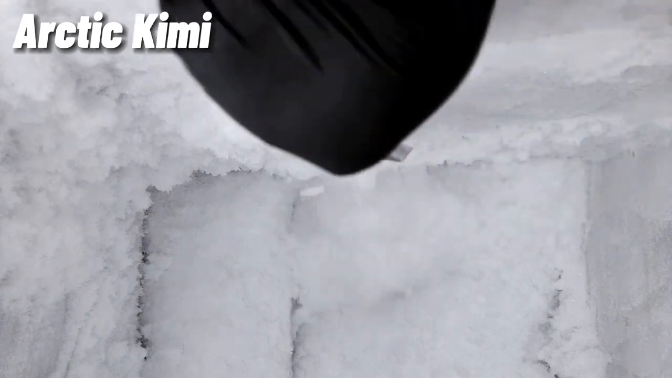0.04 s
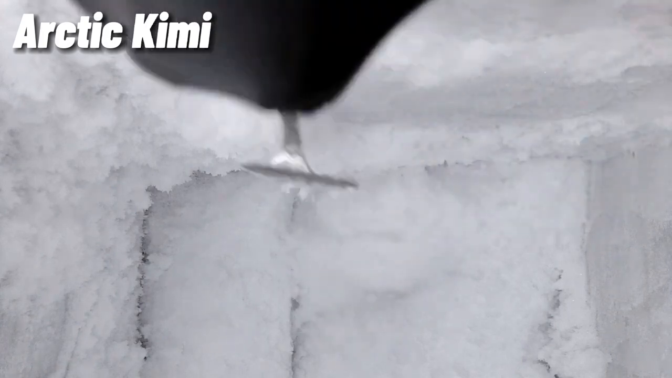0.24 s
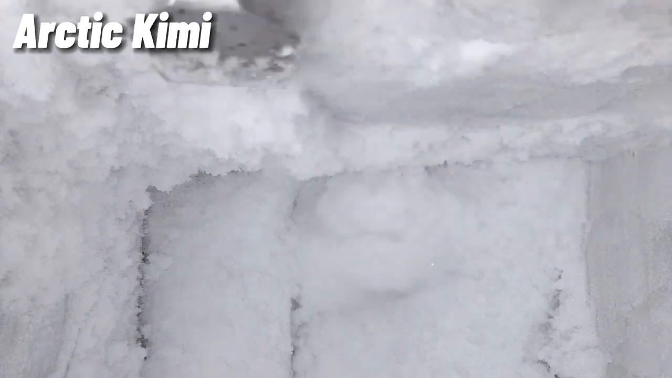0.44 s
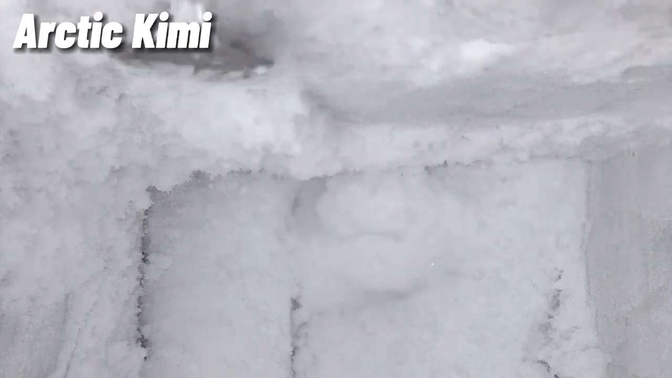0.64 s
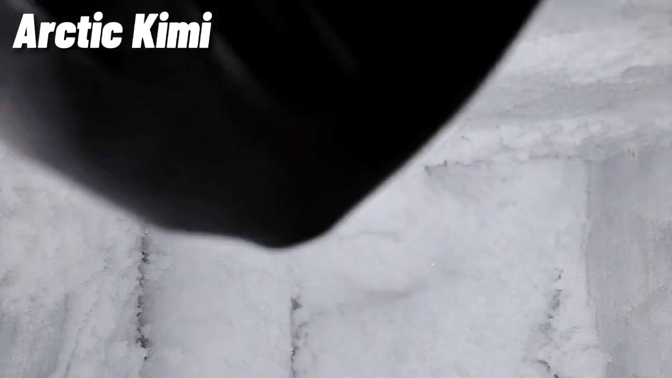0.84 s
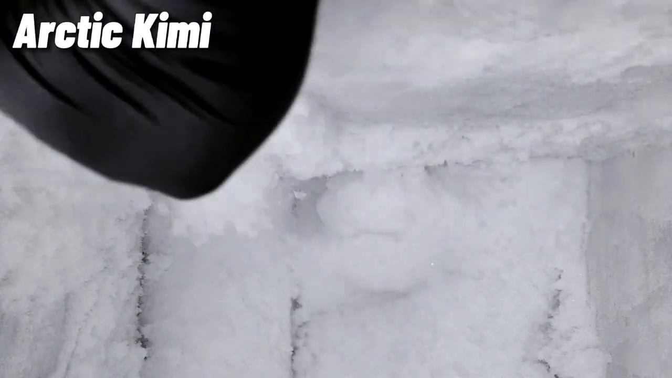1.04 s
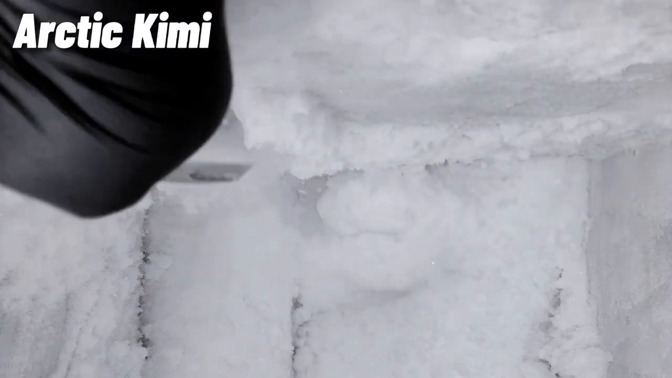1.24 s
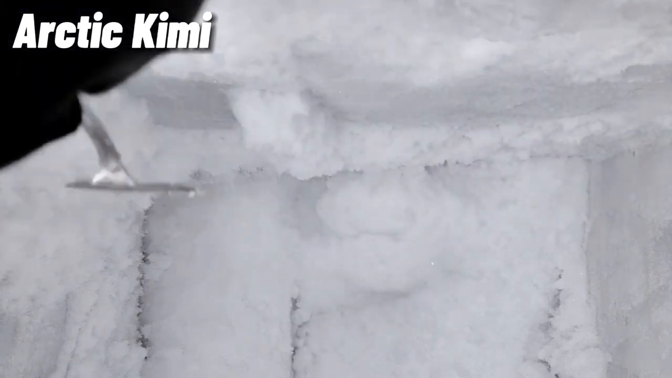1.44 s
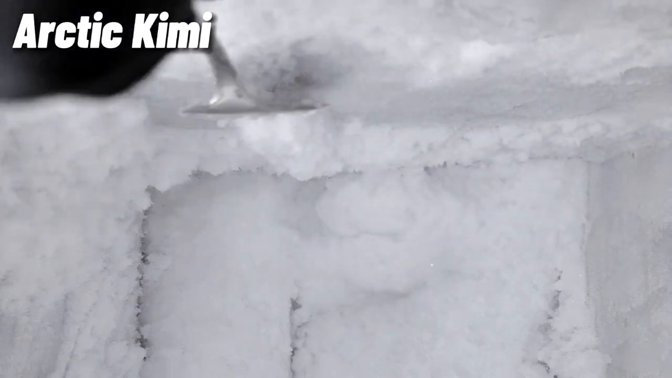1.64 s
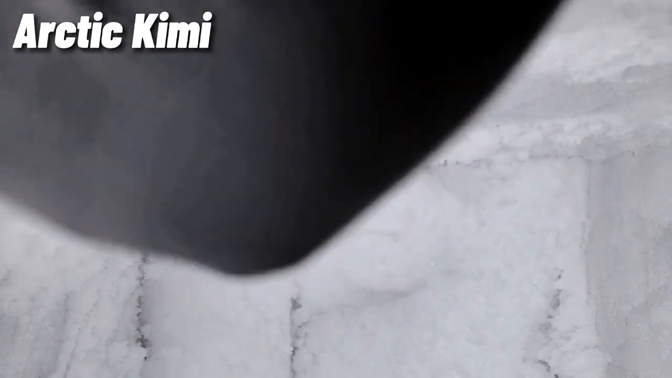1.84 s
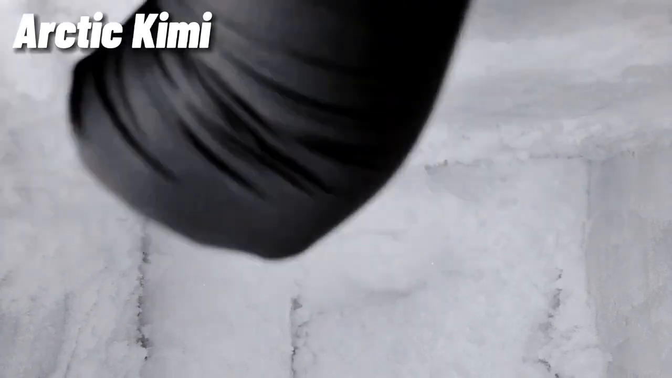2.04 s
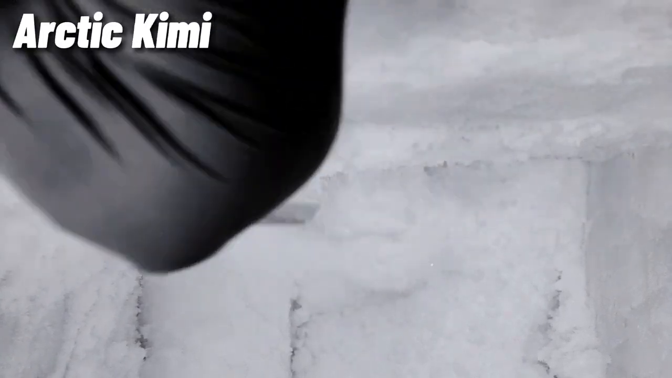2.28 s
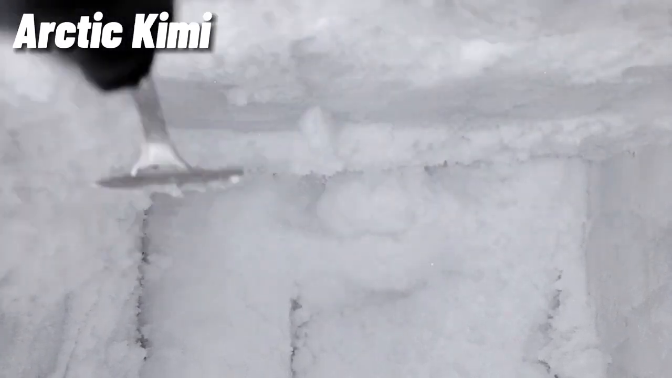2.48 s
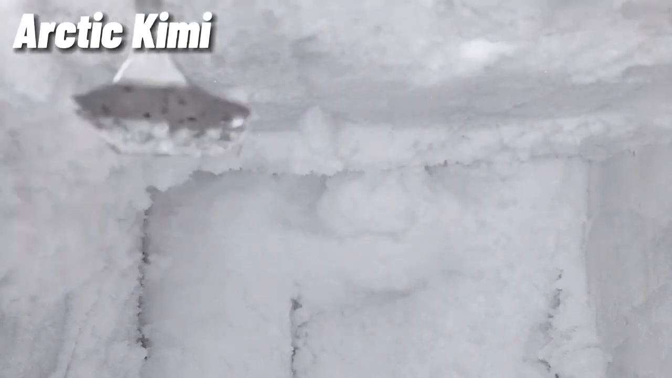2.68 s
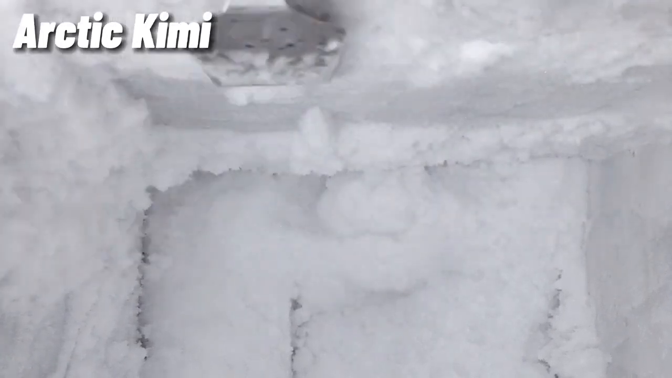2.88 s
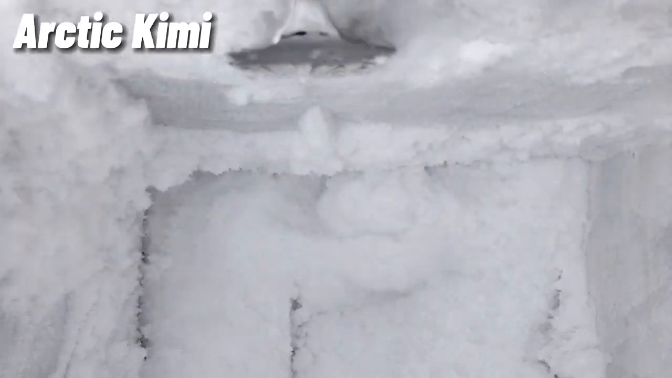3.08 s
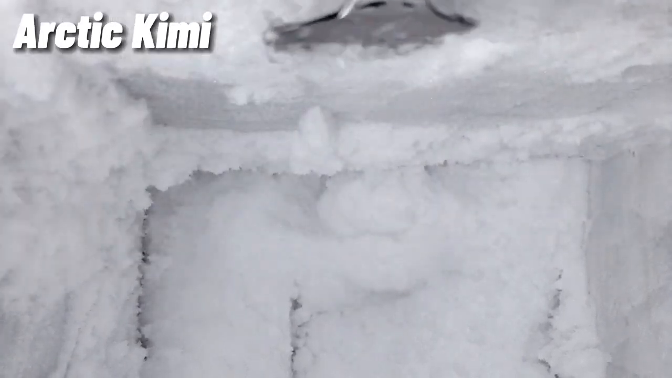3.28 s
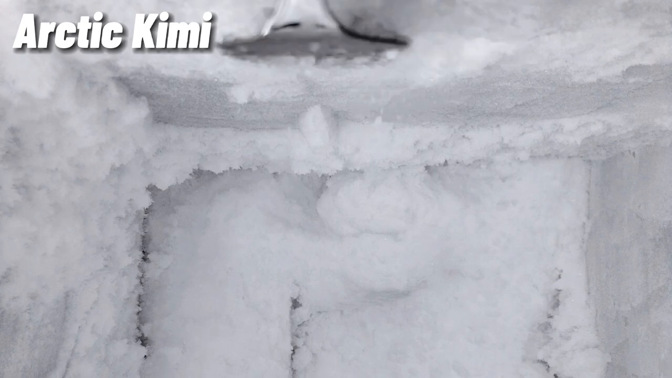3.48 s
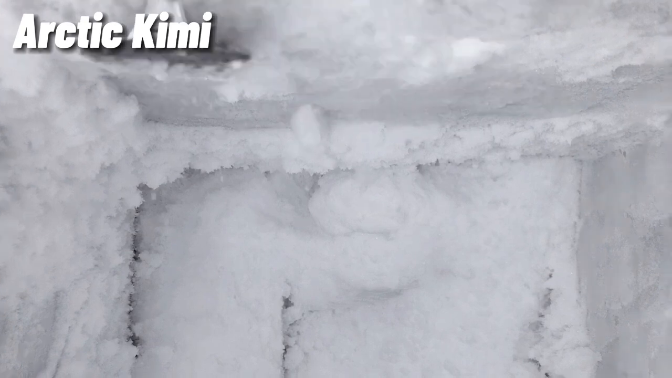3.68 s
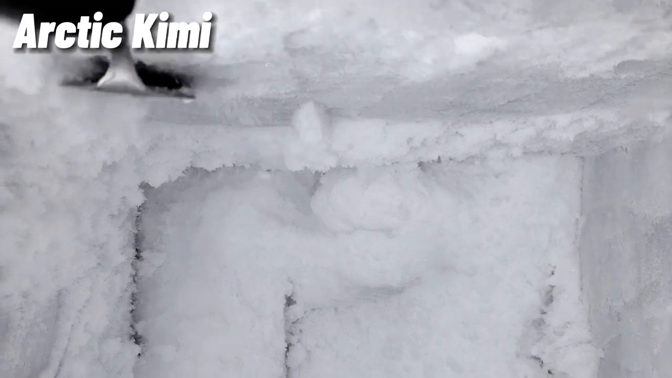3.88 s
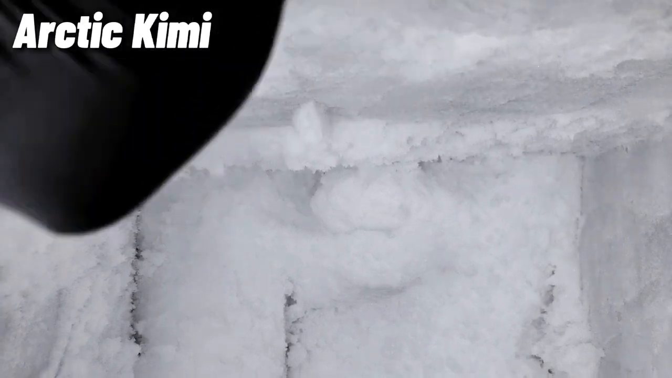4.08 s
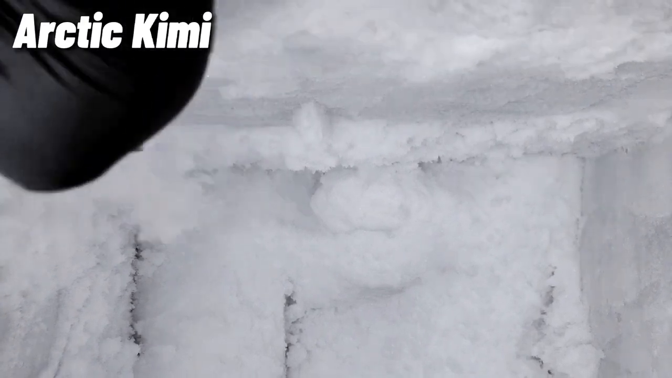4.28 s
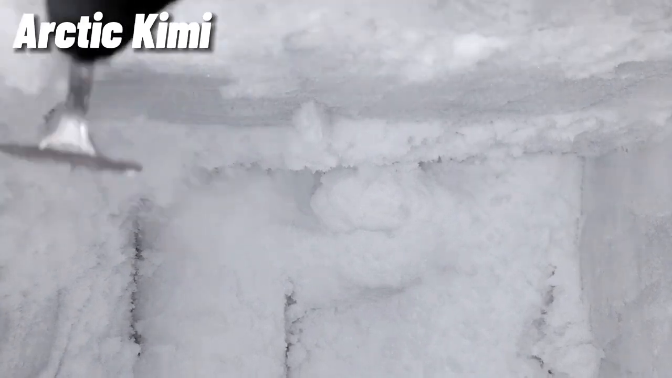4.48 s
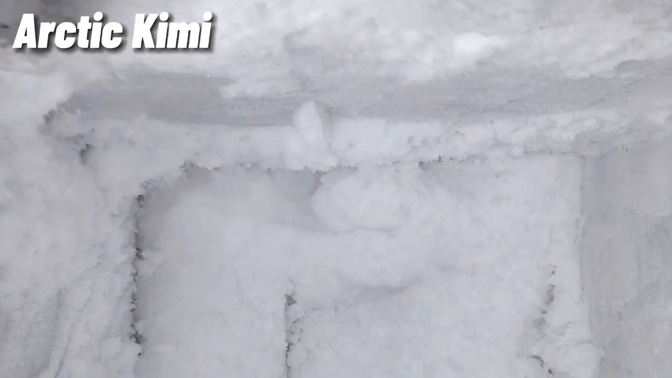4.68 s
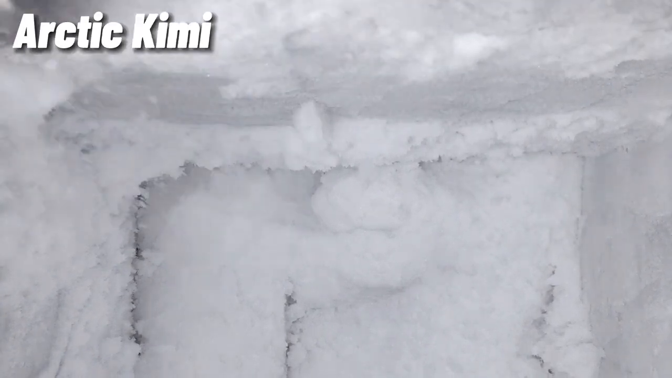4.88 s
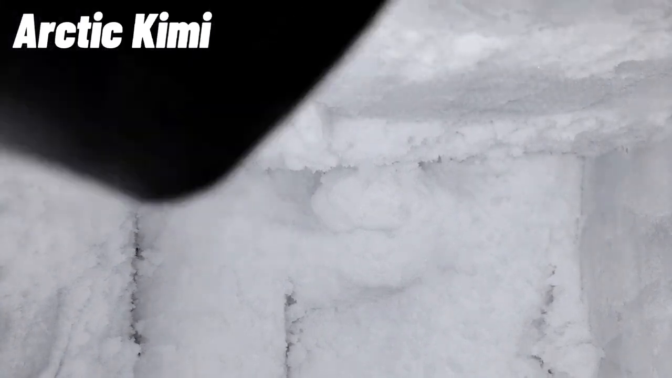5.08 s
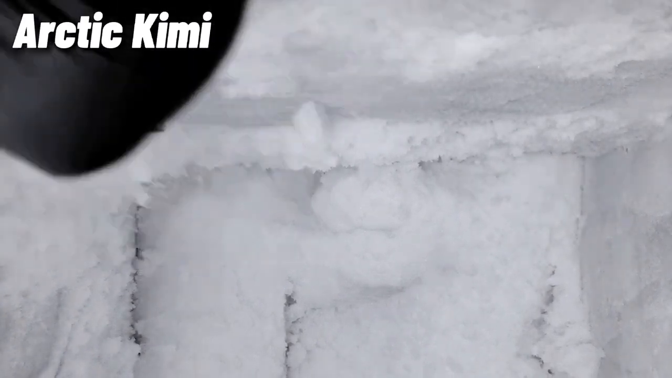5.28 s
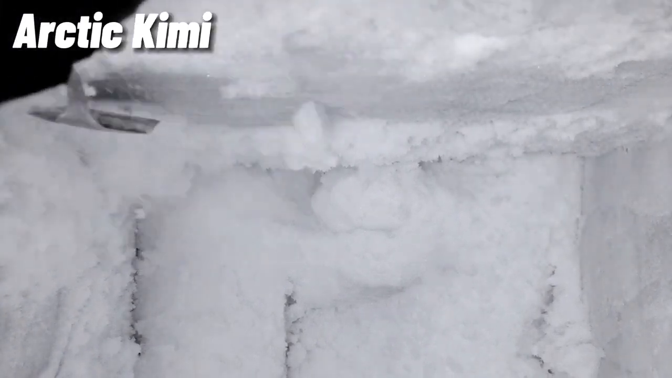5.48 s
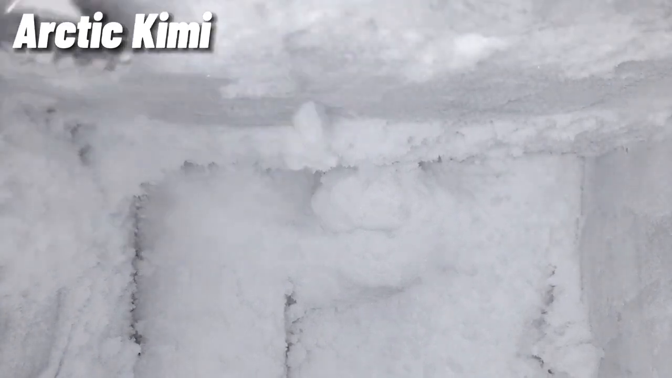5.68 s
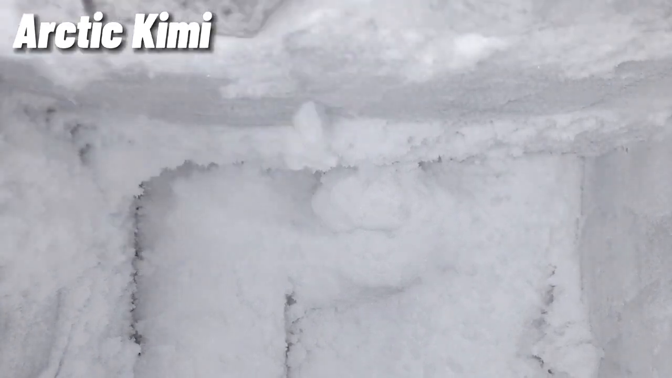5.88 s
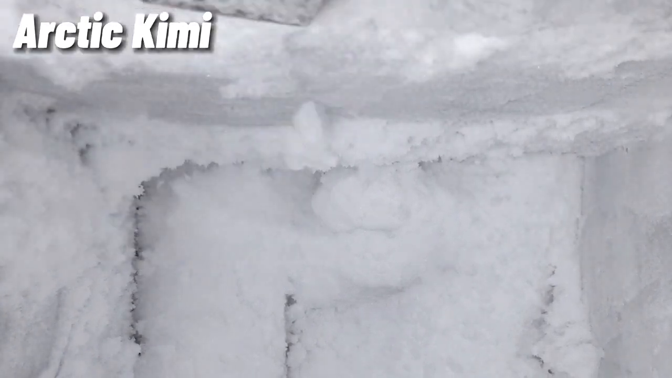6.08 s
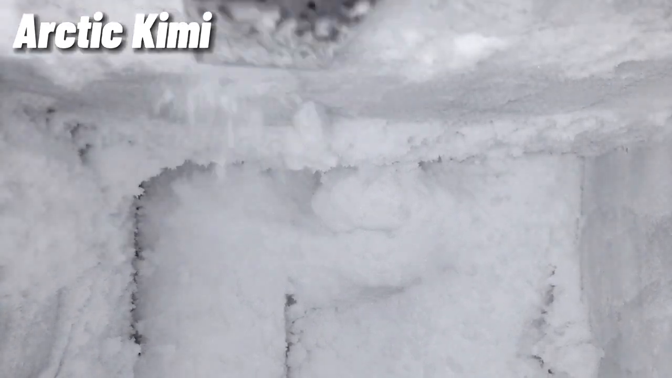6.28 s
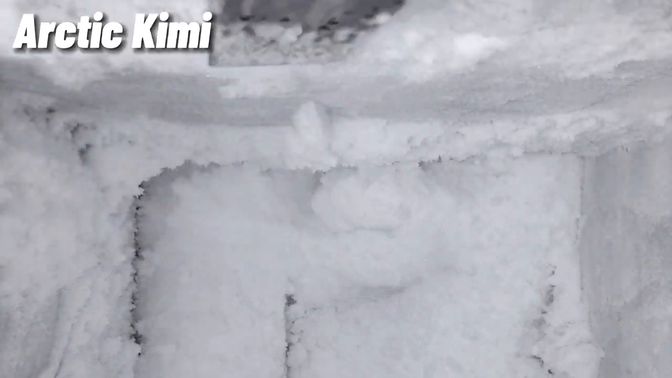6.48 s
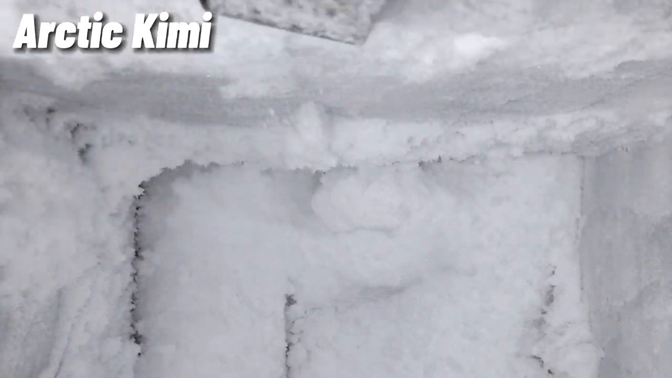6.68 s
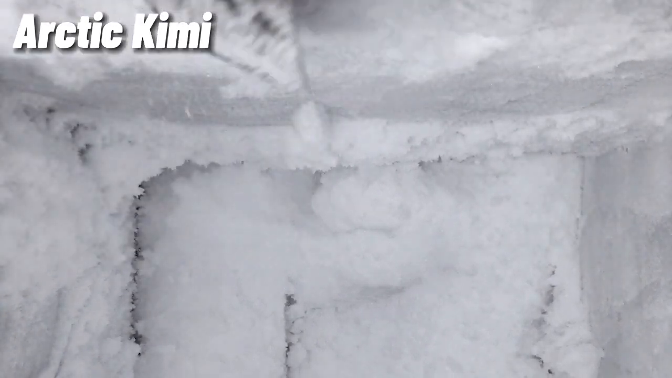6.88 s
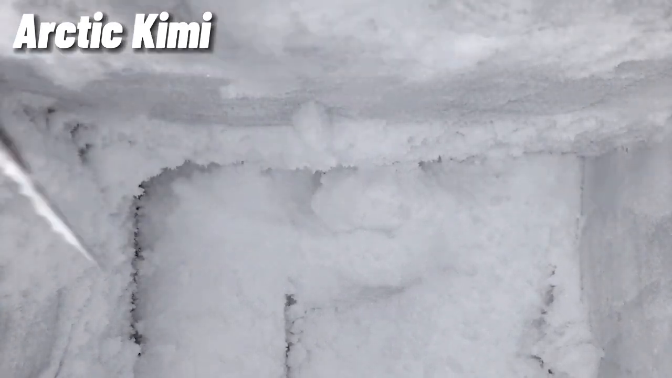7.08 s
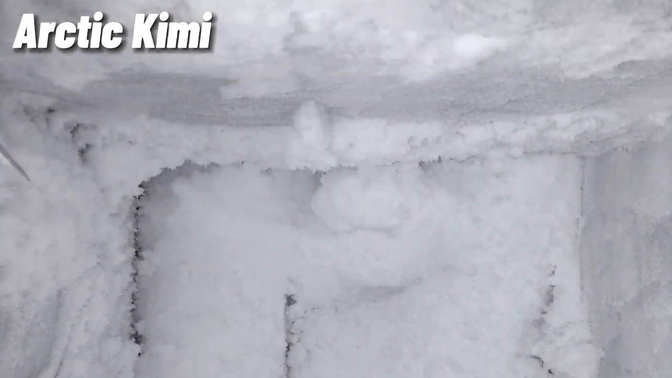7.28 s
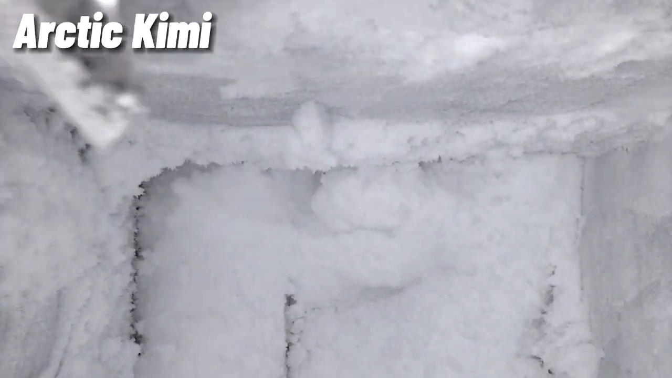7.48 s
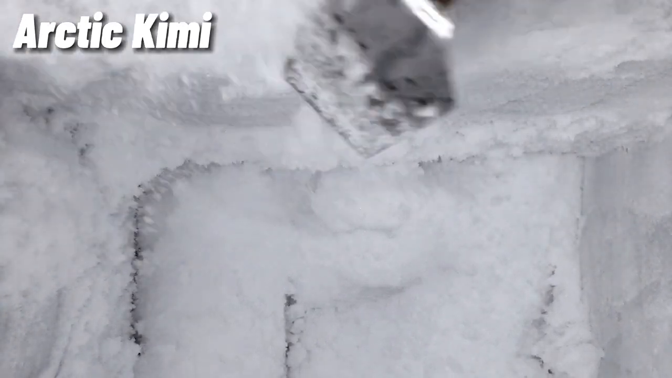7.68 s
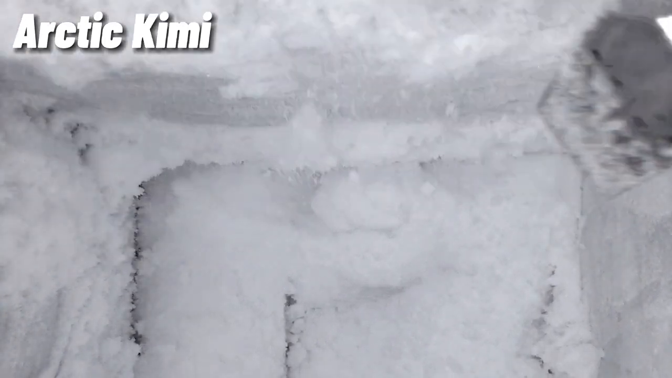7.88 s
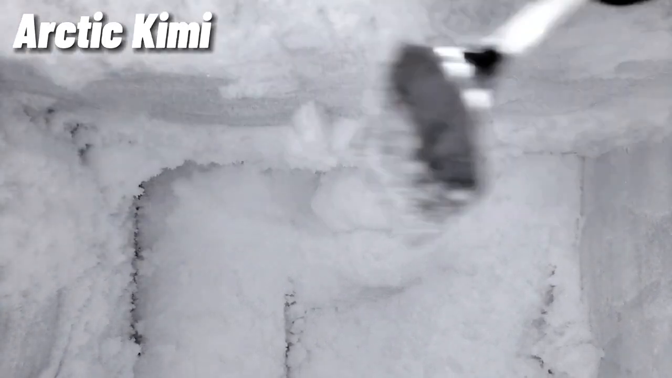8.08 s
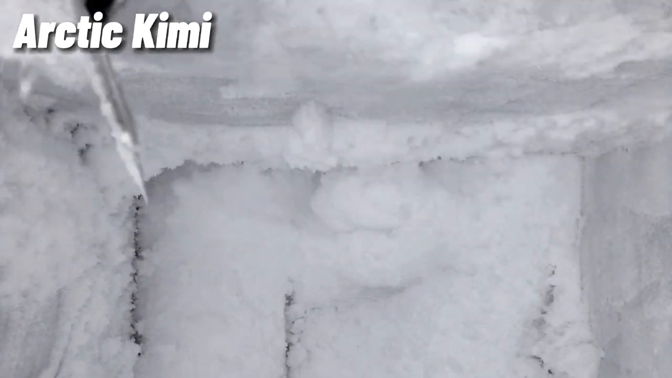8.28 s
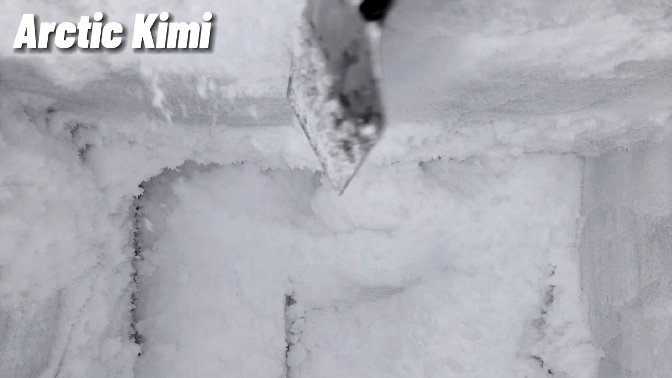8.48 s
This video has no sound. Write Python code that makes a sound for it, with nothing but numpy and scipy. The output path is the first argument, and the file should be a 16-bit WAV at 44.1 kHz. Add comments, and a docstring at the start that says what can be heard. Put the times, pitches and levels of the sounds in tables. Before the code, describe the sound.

A metal scraper works at thick freezer frost, very close. Gritty crunching strokes come in irregular bursts, with the hollow cabinet wall booming underneath. Sharp cracks and thuds mark the jabs, the blade pings briefly when it slips free, and short rough squeals appear now and then. Crumbs of frost trickle afterwards. Tight reflections from the frosted box, a faint room tail and a low motor hum.

```python
"""A steel scraper is dragged and jabbed through thick frost inside a freezer.
Thousands of random ice fractures excite the resonances of the blade and of the hollow cabinet.
Stick-slip makes the edge squeal and the wall groan; jabs crack and thud, loosened frost trickles.
The freed blade pings in decaying bending modes, with short reflections, over a low motor hum."""
import sys
import numpy as np
from scipy import signal
from scipy.fft import rfft, irfft, next_fast_len
from scipy.io import wavfile
from scipy.ndimage import uniform_filter1d

SR = 44100
rng = np.random.default_rng(int(sys.argv[2]) if len(sys.argv) > 2 else 0)


def to_wav(sig):
    """Store sig (one row per channel, or 1-D mono) as 16-bit WAV at the path in sys.argv[1].

    Samples outside -1..1 are clipped; the rate is SR.
    """
    pcm = np.clip(np.atleast_2d(sig), -1, 1) * 32767
    pcm = np.round(pcm).astype(np.int16)
    wavfile.write(sys.argv[1], SR, pcm.T)  # frames by channels


N = 376613
TIME = np.arange(N) / SR
WALL_HZ, FIZZ_HZ = 430, 5500  # lower and upper limits of the coarse crunch

# the steel is jabbed through to solid ice; levels are relative, before the trim of each layer:
# start_s, crack_peak_db, crack_brightness_hz, thud_peak_db, thud_pitch_hz, crumbling_frost_db
JAB_EVENTS = [(.009, -29, 1980, -10, 333, -35), (0.291, -37, 1500, -22.5, 604, -47.5),
              (.372, -50, 1500, -28.5, 403, -50), (0.408, -38, 2470, -56, 400, -53),
              (0.573, -4, 2060, -16.5, 236, -19), (2.705, -35, 3130, -44, 250, -47.5),
              (2.873, -40, 4100, -61, 250, -56), (2.994, -15, 1565, -11, 134, -19.5),
              (3.02, -7, 805, -9.5, 222, -31.5), (3.1985, -20, 5050, -25, 200, -44),
              (4.717, -15, 3320, -43, 250, -40), (5.026, -5.5, 2660, -48, 250, -26.5),
              (5.132, -10, 1500, -10, 112, -23), (5.843, -20.5, 1900, -52, 203, -30.5),
              (6.04, -30, 4100, -25, 200, -21), (6.342, -7, 2430, -32, 198, -20.5),
              (6.372, -11, 1990, -29, 200, -19.5), (6.48, -14, 1190, -13.5, 333, -21.5),
              (6.527, -19, 2020, -19, 125, -30.5), (6.569, -21, 2200, -49, 250, -28.5),
              (6.697, -9, 1960, -34, 199, -23), (6.748, -14, 2770, -34, 198, -24),
              (6.879, -16.5, 5600, -36, 200, -32), (6.948, -27, 1400, -52, 300, -45.5),
              (7.317, -11, 1250, -2, 255, -29), (7.742, 1, 4180, -7.5, 191, -15),
              (8.36, -13, 1310, -9, 250, -20), (8.425, -33, 2000, -22, 200, -22.5),
              (8.456, -19, 3000, -24, 217, -23)]
# blade resonances while it touches the ice: centre_hz, width_hz, level_db (relative)
BLADE_MODES = [(760, 26, -14), (899, 42, 0), (1210, 190, 2.5), (1550, 174, 1.5), (1874, 90, 3.5),
               (2073, 184, 3.5), (2760, 350, -3.5), (3543, 224, -0.5), (3750, 88, -13), (4897, 224, -4),
               (5526, 138, -4), (6510, 420, -7), (7190, 100, -10.5), (7710, 103, 0.5), (8830, 60, -11.5),
               (8350, 130, -2.5), (9130, 23, 1.5), (9810, 130, -3), (10440, 146, -4.5), (10760, 220, -7.5),
               (11740, 160, -9), (12550, 180, -4), (11360, 200, -23.5), (12780, 95, -5),
               (13750, 200, -18.5), (14300, 370, -13), (14500, 100, -10.5)]
# cabinet wall and cavity resonances: centre_hz, width_hz, level_db (relative)
CABINET_MODES = [(50, 180, -18.5), (90.1, 5.7, -4.5), (124, 20, -27.5), (154.6, 14.5, 1),
                 (181.4, 14, -18.5), (224.3, 8.5, -8), (259, 69, -14.5), (301.6, 16.5, -7.5),
                 (373, 21, -10), (416.5, 13, -10), (534, 118, -22.5), (702, 69, -13.5)]


def amp(db):
    """Amplitude ratio of a level in decibels."""
    return 10 ** (np.asarray(db) / 20)


def evened(x):
    """Normalisation to an rms value of 1."""
    return x / np.sqrt(np.mean(x ** 2) + 1e-20)


def unit(response):
    """Normalisation of an impulse response to unit energy."""
    return response / np.linalg.norm(response)


def add(mix, s, sound):
    """Superposition of a sound on the mix, in place, from time s."""
    part = mix[max(round(s * SR), 0):][:len(sound)]
    part += sound[:len(part)]


def through(x, response):
    """Linear filtering by convolution with an impulse response."""
    return signal.oaconvolve(x, response)[:N]


def cut(x, hz, kind, order):
    """Butterworth low-pass or high-pass filtering."""
    return signal.sosfilt(signal.butter(order, hz, kind, fs=SR, output="sos"), x)


def colour(points, size):
    """Spectral gain at each FFT bin, interpolated over log frequency."""
    hz, db = np.transpose(points)
    bins_hz = np.fft.rfftfreq(size, 1 / SR)
    return amp(np.interp(np.log(bins_hz + 1), np.log(hz + 1), db))


def snap(gain):
    """Minimum-phase click with the given bin gains, by folding the cepstrum."""
    cepstrum = irfft(np.log(gain + 1e-5))
    half = len(cepstrum) // 2
    cepstrum[1:half] *= 2
    cepstrum[half + 1:] = 0
    return irfft(np.exp(rfft(cepstrum)))


def filtered_noise(gain, size):
    """Gaussian noise shaped by a spectral gain, with an rms of 1."""
    return evened(irfft(rfft(rng.standard_normal(size)) * gain, size)[:N])


def wander(hz):
    """Slow random fluctuation of rms 1: noise that rolls off steeply above hz."""
    size = next_fast_len(N)
    return filtered_noise(1 / (1 + (np.fft.rfftfreq(size, 1 / SR) / hz) ** 4), size)


def ringing(modes, size):
    """Modal impulse response of a body, with dark valleys between its resonances."""
    f = np.fft.rfftfreq(size, 1 / SR)
    power = np.zeros(len(f))
    for hz, width, db in modes:
        resonance = 1 / (1 + (2 * (f - hz) / width) ** 2)
        skirt = 1 / (1 + ((f - hz) / (5 * width)) ** 2)
        power += amp(db) ** 2 * resonance * skirt
    return unit(snap(np.sqrt(power)))


def decaying_sum(impulses, decay_s):
    """Exponential relaxation after each impulse, by a one-pole recursion."""
    return signal.lfilter([1], [1, -np.exp(-1 / (decay_s * SR))], impulses)


def lagged(x, lag_s):
    """First-order lag: a one-pole smoother of time constant lag_s."""
    keep = np.exp(-1 / (lag_s * SR))
    return signal.lfilter([1 - keep], [1, -keep], x)


def scrape(crunch, push, fizz, crunch_db=-3.0, wall_db=-3.0, fizz_db=-0.5, clump_db=1.5, clump_hz=130):
    """Random fracture excitation, radiated directly, through the blade and through the wall."""
    # colour of snapping crystals: frequency_hz, density_db (relative, per Hz)
    crystal_spectrum = [(300, -13), (450, -3.5), (750, 4), (1050, -25.5), (1500, 2.5), (1950, -4.5),
                        (2400, -0.5), (3200, -3), (4200, -6.5), (5000, -16.5), (6200, -20.5),
                        (10000, -25.5), (12800, -22), (15500, -33.5)]
    # how much of the crunch the blade carries, since buried frost damps it: time_s, share (0-1)
    blade_freedom = [(0, 0.68), (.78, 0.76), (1.0, 0.32), (1.25, 0.6), (1.75, 0.82), (2.1, 0.46),
                     (2.9, 0.9), (3.15, 1), (3.8, 0.85), (4.0, 0.06), (4.35, 0.68), (4.75, 0.9),
                     (5.35, 0.33), (5.9, 0.84), (6.9, 0.9), (7.7, 0.92), (8.5, 1)]
    clumps = evened(amp(clump_db * wander(clump_hz)))
    free = np.interp(TIME, *np.transpose(blade_freedom))
    direct = snap(colour(crystal_spectrum, size=2048))
    blade = ringing(BLADE_MODES, size=4096)
    ice = np.zeros(N)
    for response, share in ((direct, 1 - free), (blade, free)):
        grains = crystals(crunch) * clumps * np.sqrt(share)
        coarse = unit(cut(cut(response, WALL_HZ, "high", order=3), FIZZ_HZ, "low", order=5))
        fine = unit(cut(response, FIZZ_HZ, "high", order=5))
        ice += amp(crunch_db) * through(grains * crunch, coarse)
        ice += amp(fizz_db) * through(grains * fizz, fine)
    return shifting(ice) + amp(wall_db) * boom(crystals(crunch) * clumps, push)


def pressure(uneven_db=0.92, uneven_hz=28, sift_push_db=6.5, sift_fizz_db=0.5):
    """Incoherent power sum of strokes, lumps and trickling frost: strengths of crunch, push, fizz."""
    # the edge is dragged through frost; bite_db is the first bite under the full level,
    # push_db and fizz_db are the push on the wall and the fine fizz over the crunch:
    # start_s, dig_in_s, hold_s, ease_off_s, bite_db, crunch_db, push_db, fizz_db
    stroke_events = [(0.0, 0.0043, .17, .055, -0.5, -30.5, 4.5, -2.5),
                     (0.235, .01, 0.12, 0.41, -3, -46, -0.5, 0.5),
                     (.75, .12, .03, 0.043, 9.5, -17, -6, -9.5), (0.937, .065, .045, .27, 11, -12, 0, -9.5),
                     (1.426, 0.023, 0.013, 0.017, 11, -57, -2, 9.5),
                     (1.696, 0.052, 0.14, 0.031, 16, -29, -5, -6),
                     (1.925, .11, 0.032, .11, 14, -16.5, -1, -9),
                     (2.097, 0.048, .03, 0.13, 6, -16, 4.5, -6),
                     (3.106, 0.013, 0.33, 0.04, -1.5, -44.5, 6, -4.5),
                     (3.482, 0.01, .31, 0.017, 6, -33, -1, -6),
                     (3.836, 0.091, 0.043, 0.12, 12, -19, -5.5, -9),
                     (4.081, 0.061, .09, .19, 8.5, -17.5, -1, -9), (4.48, .02, .2, .06, -1.5, -56, 2, -3.5),
                     (4.731, 0.12, .04, 0.051, 13, -36, -4.5, -12),
                     (4.954, 0.12, .055, 0.018, 10.5, -25, -4, -8),
                     (5.159, 0.0089, 0.14, 0.078, 5.5, -33.5, 0, -10.5),
                     (5.27, 0.089, 0.092, 0.039, 6, -16.5, -2.5, -8),
                     (5.513, 0.014, .02, 0.0079, 14, -26, -18, -8.5),
                     (5.55, 0.012, .02, 0.18, 3.5, -51, 0, -0.5),
                     (5.706, 0.077, .008, 0.02, 25.5, -25.5, -9.5, -17.5),
                     (5.9, 0.0043, 0.027, 0.24, 0.5, -35, 6.5, -5.5),
                     (6.388, 0.012, .02, 0.018, 11.5, -16.5, -0.5, -5.5),
                     (6.449, 0.0081, 0.38, 0.099, 5, -42, 3.5, -8.5),
                     (6.942, .004, 0.025, 0.044, 9.5, -41.5, -5, 2),
                     (7.409, 0.011, 0.021, 0.14, 13, -45.5, 4.5, -3),
                     (7.561, 0.12, 0.099, .11, 13, -16, 2.5, -3),
                     (7.857, 0.0069, 0.072, 0.045, 4, -21.5, 12, 1),
                     (7.969, .03, 0.044, 0.032, 14.5, -29.5, 16.5, 4.5),
                     (8.479, 0.043, .02, .05, 19, -16, -1.5, -6)]
    # lumps of frost break off, push and fizz over the crunch:
    # start_s, length_s, crunch_db, push_db, fizz_db
    chip_events = [(0.0, 0.023, -19.5, 10.5, -5.5), (0.259, 0.0087, -29.5, 0, -9),
                   (0.285, 0.026, -36, 4, -2), (0.461, 0.015, -33.5, -3, -10),
                   (0.622, 0.012, -27.5, 4.5, -13), (.719, 0.03, -40, -13, -15),
                   (1.328, 0.027, -35.5, -4, -2.5), (1.682, 0.031, -40, -7, -2.5),
                   (2.349, 0.004, -30, -6, -5.5), (3.065, 0.0079, -32.5, -5.5, -14),
                   (3.127, 0.046, -27, -5, -11.5), (3.196, 0.0039, -26.5, -2, -3.5),
                   (3.223, 0.0049, -30.5, 1, -6), (3.265, 0.0097, -34.5, 4, 0), (3.293, .035, -35, 8, -4),
                   (3.368, 0.027, -30, 1.5, -1.5), (3.528, 0.018, -24.5, -2, -8.5),
                   (3.589, 0.01, -31.5, -1, -20), (4.479, 0.015, -44.5, 8, -3),
                   (4.704, 0.013, -41, -12, -1), (4.715, 0.021, -23.5, -7, -7.5),
                   (4.818, .033, -38, 4, -0.5), (5.046, 0.0081, -17.5, -22, -12),
                   (5.097, .031, -17, 1, -10.5), (5.502, 0.0035, -22, -17, -11),
                   (5.974, 0.0064, -35, -12, 8), (6.054, 0.01, -34, 3, -13), (6.101, 0.013, -34, 2, -4.5),
                   (6.186, 0.0076, -34.5, -6, -7), (6.206, 0.021, -31.5, -3, -13), (6.355, .03, -29, 9, -3),
                   (6.586, 0.015, -31, -11, -5), (6.715, .008, -40, -3, -19),
                   (6.771, 0.007, -26.5, 6.5, -5.5), (6.797, 0.018, -20, -5, -30),
                   (6.836, 0.0056, -36, -12, 4), (7.513, 0.0091, -27, -3.5, -8),
                   (7.931, 0.0087, -21, -11, 5), (8.161, 0.0042, -42, 1.5, -4)]
    push_per_db, fizz_per_db = 1.37, 1.11  # wall and fizz exaggerate every change of effort
    crumble_lead_s = 0.0022  # the edge meets the soft frost just before the ice
    crumble_s, crumble_push_db, crumble_fizz_db = 0.01, 0.5, -12  # frost crushed by a jab
    power = np.zeros((3, N))
    for s, dig_s, hold_s, ease_s, bite_db, level, push, fizz in stroke_events:
        effort = stroke(dig_s, hold_s, ease_s, bite_db)
        efforts = effort, push + push_per_db * effort, fizz + fizz_per_db * effort
        for band, db in zip(power, efforts):
            add(band, s, amp(level + db) ** 2)
    power *= chatter(power[0]) * amp(uneven_db * wander(uneven_hz)) ** 2  # the frost is unevenly thick
    lumps = list(chip_events)
    for s, *_, db in JAB_EVENTS:
        lumps.append((s - crumble_lead_s, crumble_s, db, crumble_push_db, crumble_fizz_db))
    for s, length, level, push, fizz in lumps:
        for band, db in zip(power, (level, level + push, level + fizz)):
            add(band, s, lump(length) * amp(db) ** 2)
    sift_gain = amp([[0], [sift_push_db], [sift_fizz_db]])
    return np.sqrt(power + sift_gain ** 2 * sifting(power[0]))


def stroke(dig_s, hold_s, ease_s, bite_db, edge_s=0.0019):
    """Load envelope of a stroke in dB under its full level: it bites, digs in, holds and eases off."""
    dig_curve = 1.3  # the level climbs quickly after the bite and flattens out
    ease_db, ease_curve = 22, 2.18  # loss over the ease-off, slow at first
    t = np.arange(1, (dig_s + hold_s + 2 * ease_s) * SR) / SR
    digging = np.maximum(1 - t / dig_s, 0) ** dig_curve
    easing = (np.maximum(t - dig_s - hold_s, 0) / ease_s) ** ease_curve
    return 10 * np.log10(np.minimum(t / edge_s, 1)) - bite_db * digging - ease_db * easing


def chatter(power, skips_per_s=90, skip_db=1.0, skip_s=0.0031, light_db=-34, between=0.75):
    """Intermittent contact: a barely loaded edge skips in small random ticks (gain in power)."""
    skips = rng.exponential(1, N) * (rng.random(N) < skips_per_s / SR)
    ticks = amp(skip_db) ** 2 * decaying_sum(skips, skip_s)
    light = 1 / (1 + power / amp(light_db) ** 2)
    return 1 - light + light * (between + ticks)


def lump(length, release_s=0.0044, bite=0.11, bite_s=0.0045):
    """Brittle failure as a power envelope: a lump gives way with a crack, crumbles and lets go."""
    t = np.arange(SR // 8) / SR
    rise = np.minimum(t / 0.002, 1)
    crack = 1 + bite * np.exp(-t / bite_s)
    release = np.exp(-np.maximum(t - length, 0) / release_s)
    return (rise * crack * release) ** 2


def sifting(power, sift_db=-31.0, settle_s=0.083, crumbs_per_s=22, crumb_db=7.0, crumb_s=0.0027):
    """Relaxation of loosened frost: powder and a few crumbs trickle after the edge (power)."""
    loose = lagged(power, settle_s)
    crumbs = rng.exponential(1, N) * (rng.random(N) < crumbs_per_s / SR)
    return amp(sift_db) ** 2 * loose * (1 + amp(crumb_db) ** 2 * decaying_sum(crumbs, crumb_s))


def crystals(force, light_per_s=1500, heavy_per_s=5000, spread_db=3.5, powder=0.4):
    """Shot noise of uneven fractures over a powdery rub; the rate rises with the force."""
    rate = light_per_s + heavy_per_s * np.clip(force / amp(-20), 0, 2)
    size = amp(spread_db * np.minimum(rng.exponential(1, N), 5)) * rng.choice([-1, 1], N)
    clicks = size * (rng.random(N) < rate / SR) / np.sqrt(rate)
    return evened(evened(clicks) + powder * rng.standard_normal(N))


def shifting(x, patch_db=3.0):
    """Time-varying filtering: as the contact point wanders, each lump of frost has its own colour."""
    z = signal.stft(x, nperseg=512, noverlap=384)[2]
    patches = rng.standard_normal(z.shape)
    for axis, size in ((0, 5), (0, 3), (1, 14), (1, 8)):  # smooth over frequency, then over time
        patches = uniform_filter1d(patches, size, axis)
    gain = evened(amp(patch_db * evened(patches)))
    return signal.istft(z * gain, nperseg=512, noverlap=384)[1][:N]


def boom(grains, push, lock_db=-12.0, most_locked=0.84, groan_hz=155, waver=0.0784, build_s=0.02):
    """Mode locking: fractures shake the cabinet, and under a hard push the slips groan in step."""
    locked = most_locked * push ** 2 / (push ** 2 + amp(lock_db) ** 2)
    swell = lagged(push * np.sqrt(locked), build_s)
    pitch = groan_hz * (1 + waver * wander(21.1))
    groan = swell * np.sqrt(2) * np.sin(2 * np.pi * np.cumsum(pitch) / SR)
    shake = through(grains * push * np.sqrt(1 - locked), ringing(CABINET_MODES, size=16384))
    return cut(groan + shake, 33, "high", order=3)


def squeals(level_db=-1.0, waver=0.039, waver_hz=100, flutter_db=6.5, arch=0.37):
    """Stick-slip oscillation of the edge: a rough, unsteady tone that swells, glides and fades."""
    # the edge judders on hard ice; the level is relative, the pitch is that before the waver:
    # start_s, length_s, first_pitch_hz, last_pitch_hz, level_db
    squeal_events = [(2.107, .13, 1380, 1280, -20), (4.15, 0.089, 2430, 2200, -20),
                     (4.216, 0.096, 1700, 1653, -17), (5.269, 0.062, 1380, 1420, -21.5),
                     (5.331, .125, 1565, 1670, -13), (5.337, 0.11, 2194, 2170, -13.5),
                     (7.631, .16, 1199, 1228, -20.5), (7.855, .18, 1443, 1445, -21)]
    out = np.zeros(N)
    drift = waver * wander(waver_hz)
    flutter = evened(amp(flutter_db * wander(waver_hz)))
    for s, length, first_hz, last_hz, db in squeal_events:
        turn = np.pi * np.arange(0, length, 1 / SR) / length
        glide = first_hz + (last_hz - first_hz) * (1 - np.cos(turn)) / 2
        pitch = glide * (1 + drift[round(s * SR):][:len(turn)])
        tone = np.sqrt(2) * np.sin(2 * np.pi * np.cumsum(pitch) / SR)
        add(out, s, amp(db) * abs(np.sin(turn)) ** arch * tone)
    return amp(level_db) * flutter * out


def taps(level_db=-2.0, blade_share=0.38):
    """Impact excitation: each jab is a dry crack that also rings the blade, with its own brightness."""
    blade, out = ringing(BLADE_MODES, size=4096), np.zeros(N)
    t = np.arange(len(blade)) / SR
    for s, db, hz, *_ in JAB_EVENTS:
        splinters = unit(rng.standard_normal(len(t)) * np.exp(-t / 0.0044))
        tap = blade_share * blade + (1 - blade_share) * splinters
        tap = cut(cut(tap, hz, "high", order=1), hz, "low", order=2)
        add(out, s, amp(db) * tap / abs(tap).max())
    return amp(level_db) * out


def knocks(level_db=-1.0):
    """Impulse response of the cabinet to the brief soft push that each jab gives its wall."""
    lag_s = 0.0018  # the heavy wall moves a moment after the crack
    out, cabinet = np.zeros(N), ringing(CABINET_MODES, size=16384)
    for s, _, _, db, hz, _ in JAB_EVENTS:
        u = 2 * np.pi * hz * np.arange(2048) / SR
        soft_push = u * np.exp(-.5 * u) * np.cos(u)
        thump = signal.fftconvolve(soft_push, cabinet)
        add(out, s + lag_s, amp(db) * thump / abs(thump).max())
    return amp(level_db) * out


def pings(crunch, level_db=-3.0, rise_s=0.00057, damping_db_per_s=230, jostle=0.0077):
    """Free vibration with added damping: bending modes sing until the frost grips the blade again."""
    # the blade slips free and rings, relative levels:
    # start_s, first_mode_db, second_mode_db, third_mode_db
    ping_events = [(0.071, -27, -52, -50), (.18, -28, -50, -55), (0.573, -23.5, -47, -50),
                   (0.623, -58, -45, -25), (0.774, -19, -17.5, -43), (1.37, -36.5, -57, -59),
                   (2.355, -28.5, -58, -35), (2.998, -21.5, -21.5, -28), (3.151, -37, -23.5, -32),
                   (3.321, -27, -50, -45), (3.38, -23.5, -41, -42), (4.72, -31, -24, -20),
                   (4.819, -43, -24.5, -50), (5.784, -23.5, -41, -50), (5.844, -22, -58, -36),
                   (5.976, -15.5, -52, -16), (6.424, -36, -38, -33), (6.591, -21, -52, -28),
                   (6.644, -38, -43, -33), (6.701, -23, -46, -40), (6.753, -22, -45, -39),
                   (6.806, -27, -47, -42), (6.967, -36, -38, -59), (6.995, -38, -64, -60)]
    # bending modes of the free blade: pitch_hz, t60_s (before the added damping)
    bending_modes = [(1895, 0.31), (3482, 0.26), (4880, 0.078)]
    grip_db = np.cumsum(crunch / (crunch + amp(-58))) * damping_db_per_s / SR
    # rubbing ice jostles the blade, so its pitch is steady only when it is free
    clock = TIME + np.cumsum(jostle * wander(65) * crunch / (crunch + amp(-32))) / SR
    out = np.zeros(N)
    for s, *levels in ping_events:
        lost_db = grip_db[round(s * SR):][:SR // 2]
        t = np.arange(len(lost_db)) / SR
        swing = clock[round(s * SR):][:len(t)]
        ring = np.zeros(len(t))
        for db, (hz, t60) in zip(levels, bending_modes):
            ring += amp(db - 60 * t / t60) * np.sin(2 * np.pi * hz * swing)
        add(out, s, ring * amp(lost_db[0] - lost_db) * (1 - np.exp(-t / rise_s)))
    return amp(level_db) * out


def space(x, box_db=-13.0, box_t60=0.02, room_db=-17.0, room_t60=0.21, dull_hz=5000):
    """Reverberation: quick reflections between the frosted walls and a faint tail from the room."""
    t = np.arange(SR // 2) / SR
    box, room = rng.standard_normal((2, len(t))) * (t > .0015)
    box = unit(cut(box, dull_hz, "low", order=1) * amp(-60 * t / box_t60))
    room = unit(cut(room, dull_hz, "low", order=1) * amp(-60 * t / room_t60))
    reflections = amp(box_db) * box + amp(room_db) * room
    return x + through(cut(x, WALL_HZ, "high", order=2), reflections)


def background():
    """Steady sources: a motor hums in pure tones over the broadband still air of the room."""
    # quiet room: frequency_hz, density_db (relative, per Hz)
    air_spectrum = [(25, -9), (45, 0), (90, -1), (120, -11.5), (160, -17), (330, -21), (700, -23),
                    (1100, -30), (3500, -37), (12500, -38.5), (15500, -47)]
    # motor tones: pitch_hz, level_db (rms)
    hum_tones = [(59.2, -45), (118.5, -81), (366, -75.5), (764, -74.5)]
    size = next_fast_len(N)
    sound = amp(-52) * filtered_noise(colour(air_spectrum, size), size)
    for hz, db in hum_tones:
        sound += amp(db) * np.sqrt(2) * np.sin(2 * np.pi * (hz * TIME + rng.random()))
    return sound


def scene():
    """Superposition of scraper, cabinet and room, heard from one point."""
    crunch, push, fizz = pressure()
    contact = scrape(crunch, push, fizz) + squeals() + taps() + knocks() + pings(crunch)
    return (space(contact) + background())[None]


def record(dry):
    """Amplitude clipping of the loudest peaks, then a linear-phase band limit."""
    edge_hz = 15750
    band_limit = signal.firwin(511, edge_hz, window=("kaiser", 9), fs=SR)
    return signal.oaconvolve(np.clip(dry, -1, 1), band_limit[None], "same")


dry = scene()
out = record(dry)
to_wav(out)
```